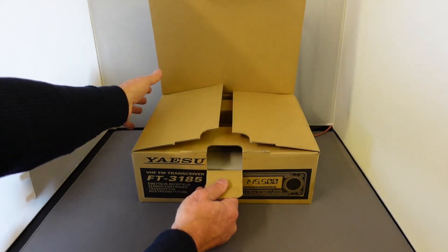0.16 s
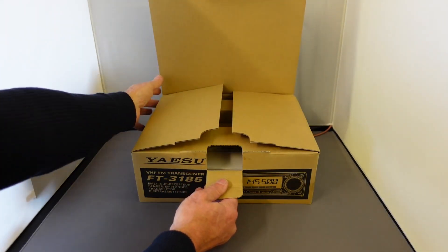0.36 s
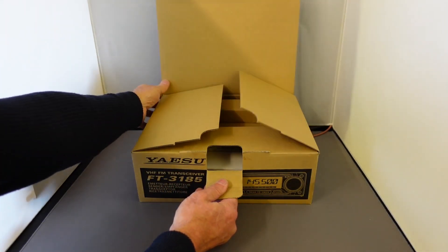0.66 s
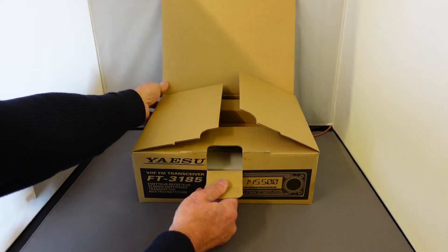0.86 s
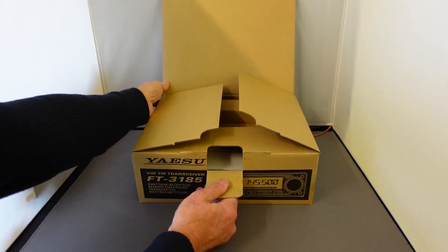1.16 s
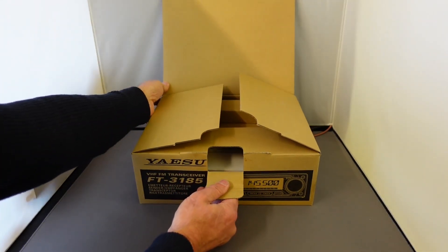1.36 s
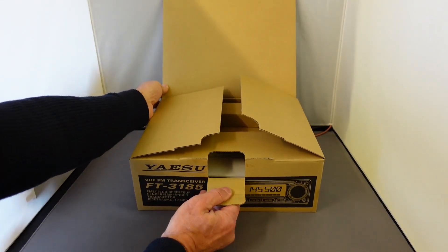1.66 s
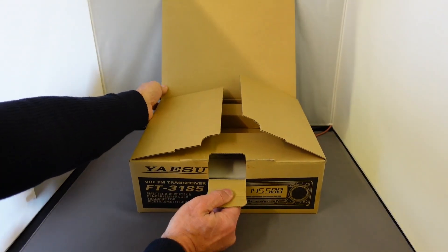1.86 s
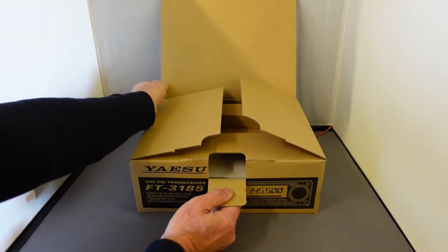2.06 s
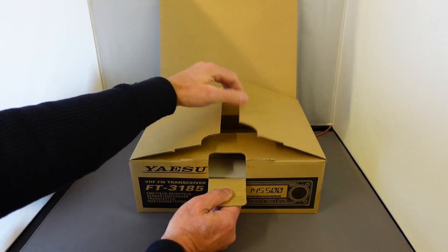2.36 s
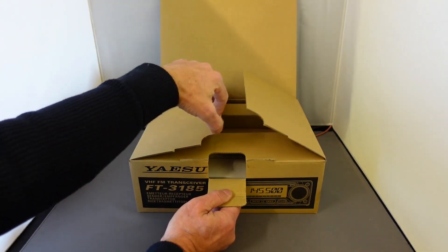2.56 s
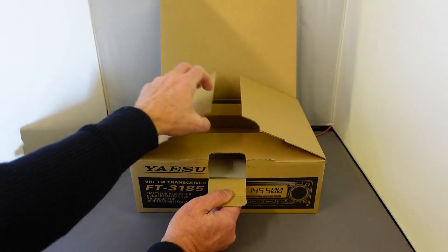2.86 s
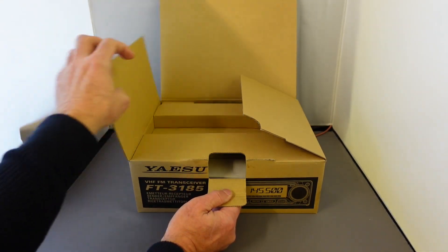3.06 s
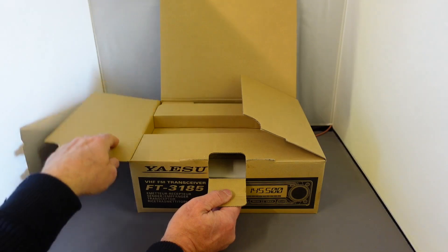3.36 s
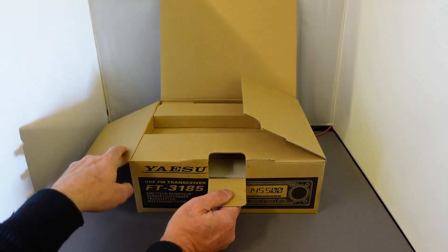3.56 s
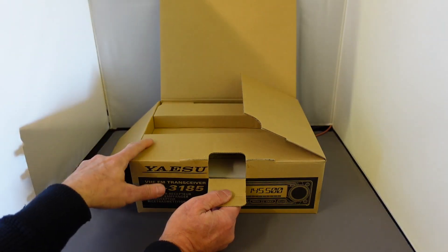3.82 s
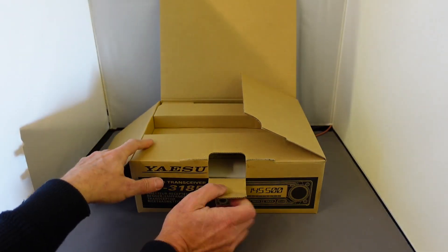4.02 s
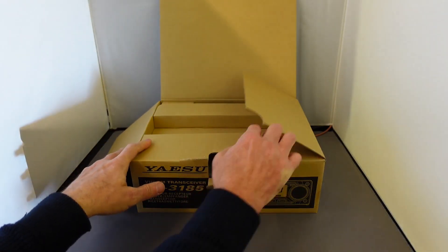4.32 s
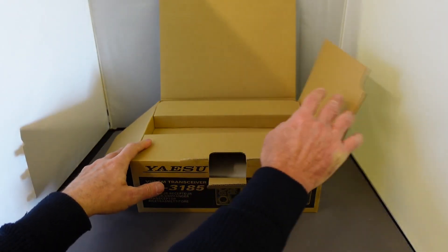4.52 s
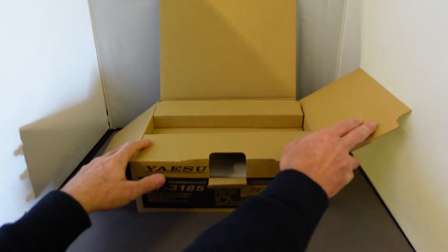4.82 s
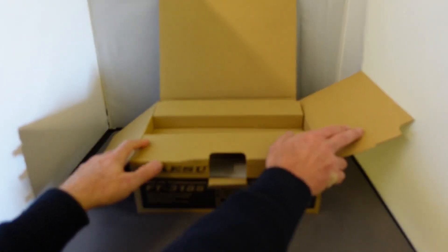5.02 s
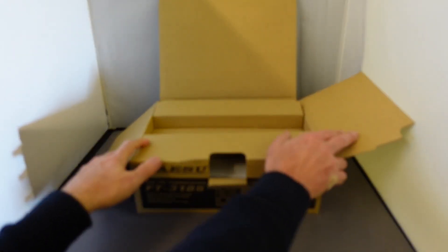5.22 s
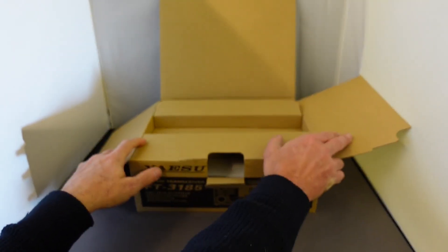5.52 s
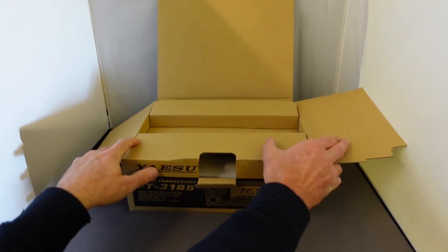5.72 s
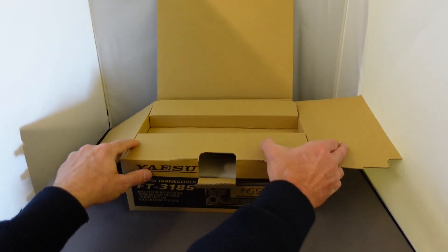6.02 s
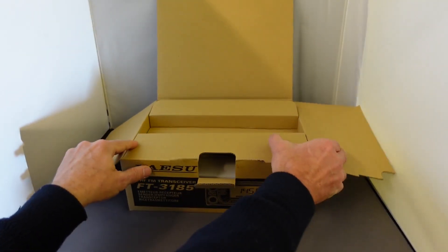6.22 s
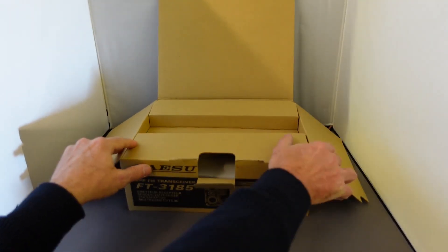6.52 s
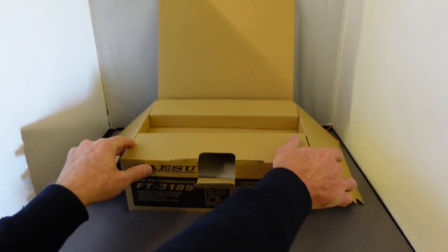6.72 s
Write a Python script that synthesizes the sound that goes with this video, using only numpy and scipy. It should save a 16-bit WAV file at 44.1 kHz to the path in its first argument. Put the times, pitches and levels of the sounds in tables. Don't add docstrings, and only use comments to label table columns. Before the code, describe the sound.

Hands rub and knock a hollow cardboard box open, flaps scraping and snapping, then one flap is forced down in loud jerky scrapes.

```python
import sys
import numpy as np
from scipy import signal
from scipy.fft import rfft, irfft, next_fast_len
from scipy.io import wavfile
from scipy.ndimage import uniform_filter1d

SR = 44100
rng = np.random.default_rng(int(sys.argv[2]) if len(sys.argv) > 2 else 0)


def volts_from_db(level):
    exponent = np.asarray(level, float) / 20
    return 10 ** exponent


def to_wav(s):
    ch = np.atleast_2d(s).T
    pcm = np.round(np.clip(ch, -1, 1) * 32767)
    wavfile.write(sys.argv[1], SR, pcm.astype(np.int16))


N = 303408

# time_s, slips_per_s, depth_db
CHATTER = [(0, 120, 1.5), (1.4, 100, 2), (1.6, 90, 5), (1.9, 110, 3), (2.3, 120, 1.5), (2.45, 110, 2.5),
           (4.98, 150, 2), (5.12, 170, 10), (5.36, 160, 10), (5.5, 210, 3), (5.78, 220, 5), (5.85, 170, 8),
           (6.32, 240, 8), (6.45, 120, 1.5)]
# mode_hz, width_hz, level_db
HOLLOW = [(202, 106, -3.5), (270.4, 41.4, 8.5), (375, 66, -1), (482.4, 72, 6.5)]
# mode_hz, width_hz, level_db
LID = [(651, 20, 4.5), (830, 81, 7.5), (1176, 310, -8.5), (1600, 68, 4.5), (2102, 49, -6), (2720, 88, -0.5),
       (2300, 28, -17)]
# mode_hz, width_hz, level_db
FLAP = [(766, 22, 2), (801, 47, 15.5), (963, 13, -16), (1152, 26, 10), (1330, 31, -1), (1475, 28, 10.5),
        (1500, 31, 12.5), (1582, 74, 10), (1750, 120, 2), (2215, 130, 6), (2485, 23, 2.5)]
# mode_hz, width_hz, level_db
EDGE = [(2910, 320, -0.5), (3380, 48, 4.5), (3890, 200, 3.5), (4200, 94, 3.5), (5200, 1200, -15),
        (5540, 60, 6.5), (6500, 1800, -18.5), (8070, 110, 5.5), (7830, 2600, -5.5)]
# mode_hz, width_hz, level_db
TIP = [(9070, 1500, 13), (10600, 3500, 14), (14460, 3300, 12)]
# mode_hz, width_hz, level_db
SKIN = [(hz, hz / 12, 0) for hz in np.geomspace(2900, 8200, 13)]
# mode_hz, width_hz, level_db
SWUNG = [(2230, 57, -15), (2830, 88, 7), (3800, 230, -12), (4660, 270, 5.5), (6230, 660, 0.5),
         (6960, 230, 5), (7800, 690, -6.5)]
# mode_hz, width_hz, level_db
RIP = [(460, 57, -2), (674, 35, 11), (900, 60, -2), (1240, 52, 7), (1550, 84, 4), (2390, 79, 5.5),
       (2850, 60, 0)]
# notch_hz, width_hz
SHADOWS = [(1985, 65), (3660, 260), (4520, 100)]
# time_s, pitch_hz, level_re_panel_db
GAP = [
    (4.8, 906, -28),
    (4.86, 799, -17),
    (4.91, 830, 1),
    (4.95, 621, 2),
    (5.02, 537, -3),
    (5.1, 520, -34),
]
# release_s, length_s, dip_db
STALLS = [(0.786, 0.051, -11.5), (3.8795, .02, -2), (1.946, 0.06, -8), (4.196, 0.022, -7),
          (4.411, 0.027, -9.5), (5.256, 0.0074, -2), (5.824, 0.03, -3.5), (5.917, 0.0079, -9),
          (5.934, 0.03, -8.5), (.553, .02, -1), (1.45, 0.033, -2), (6.028, 0.0065, -9), (6.05, 0.014, -13),
          (6.226, 0.03, -7)]
# peak_s, rise_s_per_20db, fall_s_per_20db, rasp_db, hollow_re_rasp_db
LID_STROKES = [(.02, 3, 0.04, -64, 15), (.3, 0.13, 0, -63, 9), (.36, 0.03, 0.07, -57, 14.5),
               (.525, -0.8, 0.5, -68.5, 11), (.565, -0.02, 0.17, -42.5, -2), (.686, 0.01, 0.03, -40, -24),
               (.74, -0.1, -0.27, -54, -5), (.792, 0.06, 0.04, -43.5, 2.5), (.81, 0, 0.08, -53.5, 6.5),
               (.855, -0.12, 0.15, -53, 6), (1.086, 1, 1.5, -68, 7.5), (1.26, 0.05, 0.14, -52, 0),
               (1.47, 0.15, -0.3, -52.5, -28), (1.54, 0.1655, 0.12, -42.5, -5),
               (1.616, 0.1149, 0.21, -39.5, -2.5), (1.72, 0.23, 0.19, -42, -6),
               (1.8, 0.37, -0.03, -50.5, -0.5), (1.955, 0.03, 0.18, -47, -9),
               (2.054, 0.24, 0.17, -49, -3.5)]
# peak_s, rise_s_per_20db, fall_s_per_20db, rasp_db, hollow_re_rasp_db
FINGER_STROKES = [(2.41, 0.0035, 0.071, -43, 10.5), (2.492, 0.036, 0.11, -43, 7.5),
                  (2.535, 0.055, 0.026, -54, 13), (2.794, 0.016, 0.11, -48.5, -3),
                  (2.92, 0.049, 0.17, -46.5, -3.5), (3.02, 0.066, 0.078, -46, -2.5),
                  (3.35, 0.031, 0.071, -43.5, 9), (3.42, 0.24, 0.13, -47, -38),
                  (3.51, 0.026, 0.017, -45.5, -4), (3.55, 0.036, 0.11, -59, -1),
                  (3.734, 0.034, 0.11, -53.5, 2.5), (3.812, 0.13, 0.029, -52.5, -29),
                  (3.89, 0.024, 0.061, -46, -4), (3.949, 0.017, 0.065, -48.5, 1.5),
                  (4.035, 0.1, 0.18, -43, -12.5), (4.155, 0.097, 0.058, -45, -1.5),
                  (4.22, 0.084, 0.13, -50.5, 3), (4.366, 0.0067, 0.14, -49, 10.5),
                  (4.446, 0.095, 0.1, -46.5, -1.5), (4.64, 0.014, 0.066, -60, 16.5)]
# peak_s, rise_s_per_20db, fall_s_per_20db, rasp_db, hollow_re_rasp_db
BRUSHES = [
    (.07, 0.42, 0.46, -49, -28),
    (2.324, 0.25, 0.27, -64.5, -20),
    (3.142, 0.12, 0.3, -55.5, -10),
    (3.24, 0.19, 0.24, -51.5, -7),
    (4.575, 0.1, 0.056, -49, -3),
    (4.62, 0.02, 0.039, -41.5, -12),
    (6.748, 0.014, 0.12, -59, -22),
    (6.87, 0.23, 0.5, -52, -4.5),
]
# peak_s, rise_s_per_20db, fall_s_per_20db, rasp_db, hollow_re_rasp_db
SWING_STROKES = [(.615, 0.08, 0.11, -37.5, 2.5), (.634, 0.027, 0.046, -30, -12),
                 (.659, 0.054, 0.012, -23, -9), (4.79, 0.029, 0.27, -45.5, -18),
                 (4.89, 0.062, 0.11, -23.5, -31.5), (5.06, 0.077, 0.059, -33.5, -6),
                 (5.145, 0.03, 0.063, -29.5, -8.5), (5.178, 0.047, 0.039, -31.5, -4.5),
                 (5.265, 0.013, 0.083, -31, -9), (5.32, 0.13, 0.058, -36, -0.5), (5.4, 0.012, .03, -41, -9)]
# peak_s, rise_s_per_20db, fall_s_per_20db, rasp_db, hollow_re_rasp_db
PUSHES = [
    (5.59, 0.039, 0.44, -30.5, -12),
    (5.696, 0.13, 0.09, -20.5, -45),
    (5.746, 0.12, 0.068, -21.5, -15.5),
]
# peak_s, rise_s_per_20db, fall_s_per_20db, rasp_db, hollow_re_rasp_db
WALL_JERKS = [(5.45, 0.073, 0.32, -45, -3.5), (5.53, 0.23, 0.17, -46.5, -1.5),
              (5.842, 0.038, 0.38, -27, -7), (5.98, .12, 0.082, -20.5, -14), (6.085, 0.054, 0.13, -20, -18),
              (6.145, 0.12, 0.092, -23, -9), (6.185, 0.097, 0.033, -25.5, -3.5),
              (6.21, 0.048, 0.048, -28.5, -0.5), (6.24, 0.01, 0.15, -21, -18), (6.3, 0.12, 0.051, -20, -24),
              (6.345, 0.045, 0.059, -41.5, 8.5), (6.42, .08, 0.29, -48.5, -2),
              (6.55, 0.33, 0.42, -56.5, -31)]
# panel_db, weight_share, hiss_db
LID_TOUCH = (3.4, 0.16, -4)
FINGER_TOUCH = (1.95, 0.35, -0.77)
BRUSH_TOUCH = (0.85, 0.78, 0.59)
SWING_TOUCH = (3, 0.22, 1)
PUSH_TOUCH = (4.3, 0.15, -5.5)
WALL_TOUCH = (7.65, 0.34, -3.5)
# time_s, hiss_top_db, low_ring_db, upper_hollow_db
CONTACT = [(0, -13, 3, -5.5), (.45, -7, -0.5, -5), (.65, 0, 0.5, 3), (.9, -1, 2, -2.5), (1.6, 0, 3, 3.5),
           (2.0, -1, 0.5, 6.5), (2.5, 0, 7, -1), (2.95, 2.5, 1.5, -3), (3.4, 2.5, -1.5, -2),
           (3.9, -2, 3, -3), (4.2, 0.5, 3, -1), (4.6, 10, 4.5, 4), (4.9, 0.5, 0, -4),
           (5.25, -1.5, 4.5, -3.5), (5.7, 2, 0, 7), (5.95, -1, 2.5, 3.5), (6.2, -2.5, 1.5, 3.5),
           (6.6, 3, -0.5, -4), (6.8, -7, -1, -3)]
# time_s, middle_rasp_db
GRIP = [(0, -3.5), (.15, -7), (.5, -16), (.6, -0.5), (.7, 0.5), (1.2, 1), (2.3, 0.5), (2.5, -1.5), (3.2, 2),
        (4.0, 0.5), (4.7, -2.5), (4.8, 1.5), (5.0, -1), (5.4, -0.5), (5.6, 0), (5.75, -0.5), (6.1, 2.5),
        (6.5, -2)]
# time_s, between_tones_db, upper_tone_db, near_2300_hz_db
BEND = [(5.4, -4, 2, 1), (5.55, 0, 2, 3), (5.65, -4.5, -1, 2), (5.75, -3.5, -0.5, 2), (5.85, -2, -1.5, -2),
        (5.92, -4, -1, 0), (5.98, -1.5, -5, 1), (6.08, 0, 0.5, -2), (6.13, 1, -0.5, -1), (6.19, 1, -5, -2),
        (6.24, 2.5, -0.5, 3), (6.29, -0.5, 2.5, 2), (6.4, -4, -7.5, 0.5)]
# time_s, near_1500_hz_db, near_2800_hz_db
SWAY = [(1.1, 2, 0), (1.7, -1, 1.5), (2.45, 0.5, -1.5), (4.74, 3, 6), (4.8, 5, 6), (4.92, 1, 1),
        (5.05, 2, 3), (5.16, -2.5, 0), (5.3, 0, -5), (5.4, 1, 2)]
# start_s, thud_db, thud_hz, crack_re_thud_db, ring_hz
KNOCKS = [(0.298, -33.5, 302, -2, 830), (.357, -21.5, 280, -16, 555), (0.555, -36.5, 503, 8, 1720),
          (1.453, -34.5, 557, -8, 2700), (1.948, -45, 434, -3, 1170), (2.404, -27.5, 517, 5, 1380),
          (2.414, -23.5, 282, -15, 960), (2.432, -21, 245, -1.5, 686), (2.488, -26.5, 430, 5.5, 690),
          (2.495, -20.5, 238, -9, 684), (2.543, -23, 207, -3.5, 670), (3.3427, -24, 317, 1.5, 1110),
          (3.898, -29.5, 264, -5.5, 1010), (4.198, -30, 230, -13, 755), (4.365, -32, 230, 10, 1610),
          (4.383, -27.5, 207, -5, 690), (4.42, -24.5, 242, -1, 690), (4.452, -30.5, 237, -6, 950),
          (4.639, -28, 283, -5, 690)]
# start_s, crack_db, ring_db, ring_hz
SNAPS = [(0.751, -28, -38, 3500), (0.7882, -17.5, -31.5, 1600), (0.7996, -22, -31, 1890),
         (.808, -45.5, -32.5, 1400), (.853, -48, -30, 1880), (2.792, -29, -46, 1600),
         (3.006, -24, -24.5, 1420), (2.4747, -33, -34, 1500), (2.8912, -37, -43, 2000),
         (3.355, -29, -28.5, 1500), (3.692, -41, -45, 1500), (4.4118, -24, -34, 1890),
         (3.507, -39, -36.5, 830), (3.728, -32.5, -37, 1200), (3.8805, -16.5, -23, 2330),
         (3.888, -24, -31, 2150), (4.474, -41, -26.5, 670), (4.619, -33, -41, 2430),
         (4.784, -28, -34, 3000), (5.238, -31, -26, 1039), (5.256, -15.5, -29, 1160),
         (5.395, -27.5, -27, 1090), (5.831, -14, -20, 830), (5.903, -27, -10, 800),
         (5.946, -10, -7.5, 1500), (6.03, -18, -7.5, 830), (6.064, -15, -13, 1500), (6.096, -24, -8, 1550),
         (6.141, -16, -20, 1100), (6.2275, -5.5, -7, 1090), (6.467, -23.5, -26.5, 2720),
         (6.743, -31, -38, 2350), (6.872, -30, -44, 2150),
         (.573, -36, -29, 510), (.625, -28, -26, 756), (.632, -21.5, -25, 665), (.653, -20, -24, 1500),
           (.659, -14, -20, 1240), (0.662, -25, -16, 2850), (5.511, -36, -24, 840), (5.54, -39, -21, 1540),
           (5.577, -26, -17, 1570), (5.858, -14, -10, 805), (5.87, -7, -15, 1100), (5.917, -17, -16, 1310),
           (6.051, -20, -26, 870), (6.076, -12, -7, 1070), (6.19, -12, -15, 900), (6.248, -10, -5, 3010),
           (6.256, -19, -6, 1300), (6.263, -19, -6, 900), (6.286, -14, -6, 1550), (6.291, -18, -8, 850)]
# start_s, crack_db, ring_db, ring_hz
SCUFFS = [
    (1.604, -29, -22.5, 840),
    (2.809, -32, -30.5, 636),
    (3.943, -34, -28, 2300),
    (4.152, -24, -25, 1200),
    (4.212, -27, -21.5, 1410),
    (4.289, -39, -34, 1180),
    (4.449, -22, -28, 4000),
]
# start_s, level_db, pitch_hz
BUMPS = [
    (.79, -54, 90.7),
    (2.42, -60, 80),
    (2.619, -56, 111),
    (3.35, -49, 80.6),
    (4.5, -55.5, 100),
    (5.15, -56, 60),
    (5.25, -56, 60),
    (6.07, -45, 45),
    (6.331, -50, 129),
]
# time_s, left_re_right_db
PAN = [
    (0.0, 0.5),
    (2.57, 0),
    (3.43, 2),
    (5.02, -1.0),
    (6.88, -0.5),
]
# freq_hz, level_db
FLOOR = [(18, -70), (30, -24), (252, -8), (295, -7.5), (512, -16.5), (554, -14.5), (721, -14), (2290, -22),
         (8300, -27.5), (16000, -31)]
# freq_hz, side_re_mid_db
SPREAD = [(60, -3), (180, -43), (550, -37), (1650, -25), (4970, -8.5), (15000, -7)]

RIP_S, SWUNG_S, PRESSED_S = (.545, .69), (4.74, 5.4), (5.38, 6.5)
ROUNDED = 1.17
HOLLOW_LINGERS, PANEL_LINGERS, HISS_LINGERS = 1.32, 1.11, 0.86
KNOCK_RING_DB, RING_PER_SHARPNESS = -4, 0.29
SNAP_THUD_DB, SNAP_THUD_HZ = -21.5, 339
SNAP_RISE_S, KNOCK_RISE_S, SCUFF_RISE_S, BUMP_RISE_S = .001, .0025, .006, .011
KICK_DB = -5.5
CLEAN_RING, CLEAN_T60_S = 0.76, 0.042
BOOTH_T60_S, WALL_CUT_HZ, BOOTH_DB = 0.24, 24000, -23.5
FLOOR_DB, FLOOR_ALIKE = -55, 0.44
CUTOFF_HZ = 15850


def rms_one(x):
    return x / np.sqrt(np.mean(x ** 2) + 1e-20)


def in_time(rows):
    s, *columns = np.transpose(rows)
    return [np.interp(np.arange(N) / SR, s, c) for c in columns]


def during(span_s, per_s):
    t = np.arange(N) / SR
    return np.clip(per_s * np.minimum(t - span_s[0], span_s[1] - t), 0, 1)


def gain_at(rows, hz):
    corner_hz, db = np.transpose(rows)
    return volts_from_db(np.interp(np.log(hz), np.log(corner_hz), db))


def band(x, lo_hz, hi_hz, order=2):
    edges_hz = [lo_hz, min(hi_hz, .45 * SR)]
    return signal.sosfilt(signal.butter(order, edges_hz, "band", fs=SR, output="sos"), x)


def tilted(x, lo_hz, hi_hz, db):
    sos = signal.butter(2, [lo_hz, hi_hz], "band", fs=SR, output="sos")
    return x + (volts_from_db(db) - 1) * signal.sosfiltfilt(sos, x)


def drift(rate):
    r = np.exp(-80 * np.pi * rate / SR)
    slow = signal.lfilter([1], [1, -2 * r, r * r], rng.standard_normal(N // 40 + 2002))[2000:]
    return np.interp(np.arange(N) / 40, np.arange(len(slow)), rms_one(slow))


def floor():
    hz = np.maximum(np.arange(N // 2 + 1) * SR / N, 1)
    mid, side = irfft(rfft(rng.standard_normal((2, N))) * gain_at(FLOOR, hz), N)
    both = np.sqrt(1 + FLOOR_ALIKE) * mid + np.sqrt(1 - FLOOR_ALIKE) * side * [[1], [-1]]
    return volts_from_db(FLOOR_DB) * rms_one(both)


def pressure_db():
    step = 32
    t, power = np.arange(0, N + step, step) / SR, np.full((4, 1), 1e-10)
    lingers = np.array([[1], [HOLLOW_LINGERS], [PANEL_LINGERS], [HISS_LINGERS]])
    kinds = [(LID_STROKES, LID_TOUCH), (FINGER_STROKES, FINGER_TOUCH), (BRUSHES, BRUSH_TOUCH),
             (SWING_STROKES, SWING_TOUCH), (PUSHES, PUSH_TOUCH), (WALL_JERKS, WALL_TOUCH)]
    for strokes, (panel_db, share, hiss_db) in kinds:
        for s, rise, fall, db, weight_db in strokes:
            away = np.abs(np.where(t < s, (s - t) / rise, (t - s) / (fall * lingers)))
            top_db = db + np.array([[0], [weight_db], [panel_db + share * weight_db], [hiss_db]])
            power = power + volts_from_db(top_db - 20 * away ** ROUNDED) ** 2
    return [np.interp(np.arange(N) / SR, t, 10 * np.log10(p)) for p in power]


def stalls_db():
    t = np.arange(N) / SR
    return sum(np.interp(t, [s - length, s - .002, s], [0, dip_db, 0]) for s, length, dip_db in STALLS)


def slips():
    per_s, depth_db = in_time(CHATTER)
    turns = np.cumsum(per_s * volts_from_db(2.5 * drift(80))) / SR
    strength = np.clip(rng.standard_normal(3000), -2, 1.3)[turns.astype(int)]
    slips_db = depth_db * uniform_filter1d(1 - 2 * (turns % 1) + .2 * strength, size=40)
    jolts = (np.diff(turns % 1, prepend=0) < 0) * volts_from_db(slips_db + 1.3 * strength)
    return slips_db, jolts


def friction(slips_db, grain_db, per_s, smooth_db, releases):
    sizes = volts_from_db(grain_db * np.minimum(rng.exponential(1, N), 3)) * rng.choice([-1, 1], N)
    clicks = sizes * (rng.random(N) < per_s / SR)
    hiss = volts_from_db(smooth_db) * rng.standard_normal(N)
    force = (clicks + hiss) * volts_from_db(slips_db) + releases
    return force / np.sqrt(uniform_filter1d(force ** 2, size=1300))


def body(x, peaks, broad_db, shift_db, flicker_db=1.5):
    out = volts_from_db(broad_db) * x
    for k, (hz, width, db) in enumerate(peaks):
        r, w = np.exp(-np.pi * max(width, 15) / SR), 2 * np.pi * hz / SR
        fed = x * volts_from_db(db + shift_db * drift(6.4) + flicker_db * drift(50.5))
        zeros, poles = [(1 - r * r) / 2, 0, (r * r - 1) / 2], [1, -2 * r * np.cos(w), r * r]
        out = out + (-1) ** k * signal.lfilter(zeros, poles, fed)
    return out


def wandering(x):
    bent = np.interp(np.arange(N) + .00035 * SR * drift(9), np.arange(N), x)
    return bent / (uniform_filter1d(bent ** 2, size=2600) + 1e-9) ** .35


def shadowed(x):
    for hz, width in SHADOWS:
        x = x + .5 * (signal.lfilter(*signal.iirnotch(hz, hz / width, fs=SR), x) - x)
    return x


def lid_panel(coarse, ripped):
    lid = rms_one(band(body(coarse, LID, broad_db=-3.0, shift_db=2.5), 727, 2960))
    rip = rms_one(band(body(coarse, RIP, broad_db=-8.0, shift_db=3.0), 500, 3600))
    return (1 - ripped) * lid + ripped * rip


def flap_panel(coarse, wall_jolts):
    ring = band(body(coarse, FLAP, broad_db=-7, shift_db=1.0, flicker_db=3.0), 720, 3000, order=4)
    flap = rms_one(shadowed(wandering(ring)))
    kicks = rms_one(shadowed(band(wall_jolts + 1e-18, 780, 1750, order=4)))
    flap = rms_one(flap + 0.36 * kicks)
    between_db, upper_db, high_db = in_time(BEND)
    flap = tilted(flap, 920, 1380, between_db)
    flap = tilted(flap, 1420, 1720, upper_db)
    return tilted(flap, 2100, 2600, high_db)


def air_gap(deep, coarse):
    gap_hz, gap_db = in_time(GAP)
    phase = 2 * np.pi * np.cumsum(gap_hz) / SR
    gap = rms_one(band(deep, 3.0, 62, order=1)) * np.sin(phase)
    gap += 0.45 * rms_one(band(coarse, 3.5, 60, order=1)) * np.sin(2.2 * phase)
    return volts_from_db(gap_db) * gap


def rasp_of(fine, on_flap, swung):
    skin = rms_one(band(body(fine, SKIN, broad_db=6, shift_db=4), 2700, 8600))
    scrape = band(body(fine, EDGE, broad_db=-8.5, shift_db=2.0, flicker_db=2.5), 1940, 8700)
    edge = rms_one(shadowed(wandering(scrape)))
    loose = band(body(fine, SWUNG, broad_db=-4.0, shift_db=3.0, flicker_db=3.0), 2500, 9600)
    skin = (1 - swung) * skin + swung * rms_one(wandering(loose))
    return (1 - on_flap) * skin + on_flap * edge


def tip_hiss(finest, on_flap, swung, ripped, sharp_db):
    tips = rms_one(band(body(finest, TIP, broad_db=-25, shift_db=1.5), 7500, 28000))
    tips = (1 - on_flap) * tips + on_flap * rms_one(band(tips, 5400, 15700, order=1))
    tips = tilted(tips, 11500, 18000, sharp_db)
    tips = tilted(tips, 10600, 11400, -4.0 * swung)
    return tilted(tips, 7300, 10200, -4.0 * ripped)


def rubbing():
    rasp_db, hollow_db, panel_db, hiss_db = pressure_db()
    slips_db, jolts = slips()
    on_flap, ripped, swung = during(PRESSED_S, 20), during(RIP_S, 80), during(SWUNG_S, 20)
    heavy_db = slips_db * (.4 + .6 * on_flap)
    light_db = slips_db * (1 - .35 * on_flap)
    wall_jolts = jolts * on_flap
    coarse = friction(heavy_db, grain_db=2.6, per_s=1300, smooth_db=-14, releases=15.0 * wall_jolts)
    deep = friction(0.54 * heavy_db, grain_db=3.0, per_s=750, smooth_db=-15.0, releases=0)
    fine = friction(light_db, grain_db=-3.5, per_s=9800, smooth_db=-4.0, releases=1.0 * jolts)
    finest = friction(light_db, grain_db=1.0, per_s=6000, smooth_db=-11.0, releases=1.9 * jolts)

    sharp_db, middle_db, small_db = in_time(CONTACT)
    panel = (1 - on_flap) * lid_panel(coarse, ripped) + on_flap * flap_panel(coarse, wall_jolts)
    panel = tilted(panel + air_gap(deep, coarse), 600, 950, middle_db)
    hollow = rms_one(band(body(deep, HOLLOW, broad_db=-5, shift_db=2.2), 156.5, 584, order=3))
    hollow = tilted(hollow, 400, 650, small_db)
    rasp = rasp_of(fine, on_flap, swung)
    tips = tip_hiss(finest, on_flap, swung, ripped, sharp_db)

    board = tilted(volts_from_db(rasp_db) * rasp + volts_from_db(panel_db) * panel, 1900, 4000, *in_time(GRIP))
    board = band(board, 230, 19000)
    low_db, high_db = in_time(SWAY)
    board = tilted(tilted(board, 1250, 1850, low_db), 2500, 3100, high_db)
    return volts_from_db(stalls_db()) * (board + volts_from_db(hollow_db) * hollow + volts_from_db(hiss_db) * tips)


def contacts():
    rows = []
    for s, db, hz, sharp_db, ring_hz in KNOCKS:
        ring_db = db + KNOCK_RING_DB + RING_PER_SHARPNESS * sharp_db
        rows.append((s, db + sharp_db, db, hz, ring_db, ring_hz, KNOCK_RISE_S))
    for edges, rise in [(SNAPS, SNAP_RISE_S), (SCUFFS, SCUFF_RISE_S)]:
        for s, db, ring_db, ring_hz in edges:
            rows.append((s, db, ring_db + SNAP_THUD_DB, SNAP_THUD_HZ, ring_db, ring_hz, rise))
    return rows


def panel_ring(push, t, hz, rise):
    rough = push * volts_from_db(-60 * t / 0.047) * np.minimum(t / rise, 1)
    rough = band(rough, 0.907 * hz, 1.122 * hz, order=1)
    clean = np.sin(2 * np.pi * hz * t) * volts_from_db(-60 * t / CLEAN_T60_S) * np.minimum(t / (1.1 * rise), 1)
    return rough / np.abs(rough).max() + CLEAN_RING * clean


def hollow_thud(t, hz):
    beat = np.sin(2 * np.pi * hz * t) + 0.4 * np.sin(2 * np.pi * 0.716 * hz * t)
    beat += 0.73 * np.sin(2 * np.pi * 1.9 * hz * t) * volts_from_db(-60 * t / 0.02)
    return -beat * volts_from_db(-60 * t / 0.068) * np.minimum(t / 0.0035, 1)


def taps():
    size = 5000
    out, t = np.zeros(N + size), np.arange(size) / SR
    for s, crack_db, thud_db, thud_hz, ring_db, ring_hz, rise in contacts():
        burst, push = rng.standard_normal((2, size))
        crack = band(burst * volts_from_db(-60 * t / .025) * np.minimum(t / rise, 1) ** 2, 1400, 9500)
        kick = band(1. * (t == 0), 450, 6000)
        kick_db = crack_db + KICK_DB - 20 * np.log10(rise / SNAP_RISE_S)
        parts = [(kick_db, kick), (crack_db - 5.5, crack),
                 (ring_db - 3.5, panel_ring(push, t, ring_hz, rise)),
                 (thud_db - 4.5, hollow_thud(t, thud_hz))]
        at = round(s * SR)
        out[at:at + size] += sum(volts_from_db(db) * part / np.abs(part).max() for db, part in parts)
    return out[:N]


def table():
    t, out = np.arange(N) / SR, np.zeros(N)
    for s, db, hz in BUMPS:
        late = np.maximum(t - s, 0) / BUMP_RISE_S
        out += volts_from_db(db) * late * np.exp(1 - late) * np.sin(2 * np.pi * hz * (t - s))
    return out


def close_echoes(x):
    size, t60_s = next_fast_len(N + 4000), .04
    scatter = rfft(rng.standard_normal(4000) * volts_from_db(-60 * np.arange(4000) / SR / t60_s), size)
    scatter = scatter / np.sqrt(np.mean(abs(scatter) ** 2))
    hz = np.maximum(np.arange(size // 2 + 1) * SR / size, 1)
    colour = volts_from_db(-7.5) * gain_at(SPREAD, hz)
    return irfft(rfft(x, size) * colour * scatter, size)[:N] * [[1], [-1]]


def booth(x):
    size = next_fast_len(N + SR)
    turn = np.exp(-2j * np.pi * np.arange(size // 2 + 1) / size)
    dull = np.exp(-2 * np.pi * WALL_CUT_HZ / SR)
    wall = (1 - dull) / (1 - dull * turn)
    out = np.zeros((2, size // 2 + 1), complex)
    for k, lag in enumerate((rng.uniform(.006, .03, 16) * SR).astype(int)):
        loop = volts_from_db(-60 * lag / SR / BOOTH_T60_S) * wall * turn ** lag
        out[k % 2] += (-1) ** (k // 2) * loop / (1 - loop)
    return irfft(out * rfft(x, size), size)[:, :N]


def scene():
    pan_db, = in_time(PAN)
    box = (rubbing() + taps() + table()) * volts_from_db([pan_db / 2, -pan_db / 2])
    mid = box.mean(axis=0)
    return box + close_echoes(mid) + volts_from_db(BOOTH_DB) * booth(mid) + floor()


def low_pass(x):
    return signal.sosfilt(signal.butter(12, 16810, fs=SR, output="sos"), x)


def record(dry):
    rounded = 1.1 * np.tanh(dry / 1.1)
    thin = signal.sosfilt(signal.butter(2, 75.0, "high", fs=SR, output="sos"), rounded)
    cut = signal.sosfilt(signal.ellip(10, .5, 60, CUTOFF_HZ, fs=SR, output="sos"), thin)
    return low_pass(cut)


dry = scene()
out = record(dry)
to_wav(out)
```